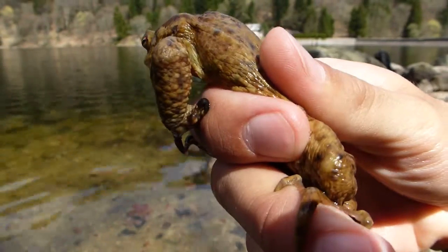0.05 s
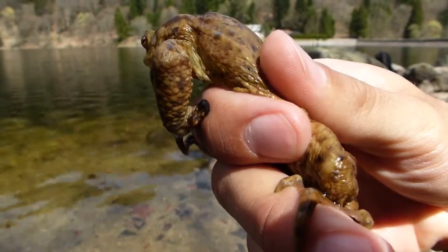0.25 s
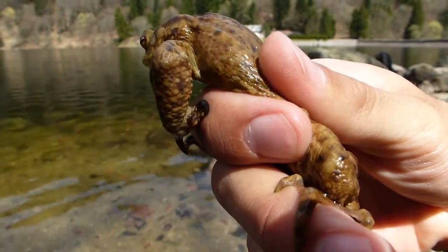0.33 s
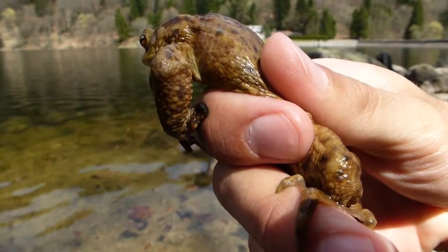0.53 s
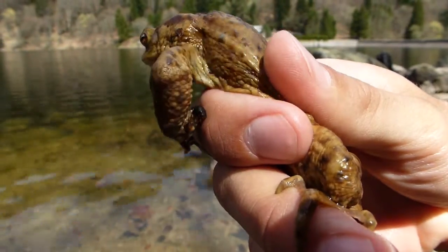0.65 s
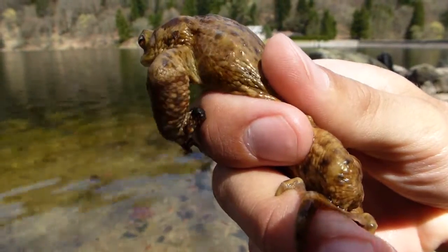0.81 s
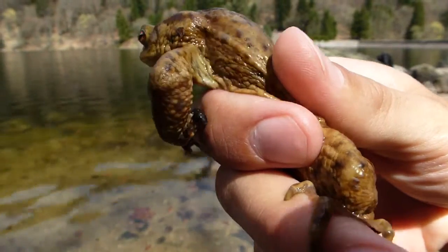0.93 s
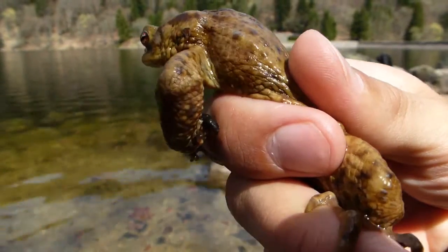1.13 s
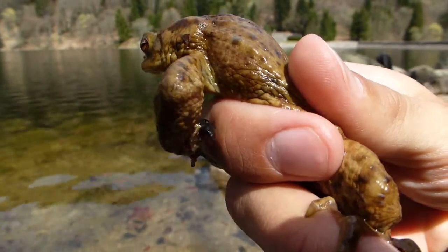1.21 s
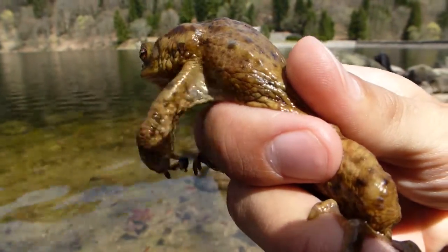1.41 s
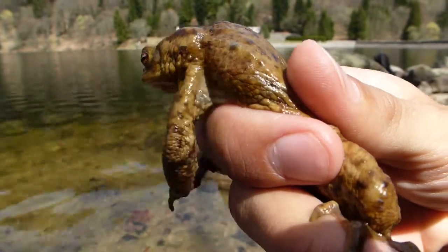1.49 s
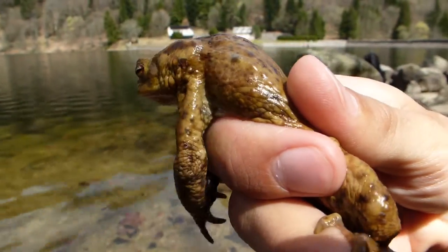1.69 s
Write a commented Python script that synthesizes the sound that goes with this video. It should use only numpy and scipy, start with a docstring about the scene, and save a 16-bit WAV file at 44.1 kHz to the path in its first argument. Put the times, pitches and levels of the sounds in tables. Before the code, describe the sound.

A toad gives four short, high, buzzy croaks close to the microphone, at about 0.2, 0.4, 0.7 and 1.0 seconds, each starting with a tiny raspy stutter. Soft wind and lake water wash underneath and carry on after the calls stop. A faint, distant trill wavers from around 0.5 to 1.5 seconds, and one thin, falling bird note sounds far off at 0.8 seconds.

```python
"""Beside a lake, a toad held in the hand gives four short release calls close to the microphone.
Its membranes catch in a few raspy stutters, then settle on a buzzy tone, coloured by the throat,
that mellows and sags as the air runs out. Behind it lies a soft wash of wind and water,
with a faint trill far off and one thin, falling bird note."""
import sys
import numpy as np
from scipy import signal
from scipy.fft import rfft, irfft
from scipy.io import wavfile
from scipy.ndimage import uniform_filter1d

SR = 44100
rng = np.random.default_rng(int(sys.argv[2]) if len(sys.argv) > 2 else 0)


def unload_wav(signal):
    """Save mono or channel-first audio to the path in sys.argv[1] as 16-bit WAV at rate SR, clipped to [-1, 1]."""
    wavfile.write(
        sys.argv[1],
        SR,
        np.round(np.clip(np.atleast_2d(signal).T, -1, 1) * 32767).astype(np.int16),
    )


N = 77175  # 1.75 s

# The held part of each call, right at the microphone. Each row: start and length in seconds, level in
# dB, pitch in Hz, rise in seconds, scoop and climb as shares of the pitch, fade, buzz and sizzle in dB,
# roughness from 0 to 1, the throat's peak in Hz, and the start of its treble roll-off in Hz.
CROAKS = [(0.2384, 0.04, -11.5, 942, 0.0063, 0.013, -.008, -9, -38, -29, 0.22, 3700, 13100),
          (.4380, 0.054, -10.5, 920.1, .024, 0.1727, 0.1, -4, -35, -33, 0.13, 2560, 10100),
          (0.6977, .0355, -8.5, 995.3, 0.0027, .02, -0.0069, -13, -41.5, -44, 0.24, 3350, 11900),
          (0.9703, 0.037, -11, 1006, 0.0041, 0.018, -0.01, -8.5, -35, -36, 0.2, 4380, 13000)]


def croak(start, length, db, hz, rise, scoop, climb, fade_db, buzz_db, sizzle_db, roughness):
    """Controls of a held tone: it scoops up to pitch, mellows, then sags as the air runs out."""
    t = np.clip(np.arange(N) / SR - start, 0, length)
    progress = t / length
    release = soft_step((length - t) / 0.013)
    gate = soft_step(t / rise) ** 1.51 * release
    bright_gate = soft_step(t / rise * 1.17) ** 3 * release ** 1.1
    onset_dip = scoop * np.exp(-(2.8 * t / rise) ** 2)
    sag = 0.14 * np.exp((t - length) / 0.0043)
    pitch = hz * (1 + climb * (progress - 0.5) - onset_dip - sag)
    tone = gate * amp(db + fade_db * progress ** 1.98)
    octave = gate * amp(-34 + 11 * progress ** 2)  # swells as the pressure falls
    buzz = bright_gate * amp(buzz_db - 11.5 * progress ** 2)
    sizzle = bright_gate * amp(sizzle_db - 23 * progress ** 1.42)
    return pitch, roughness, tone, octave, buzz, sizzle


def throat(hz, peak_db=4.5, width_hz=380, roll_off_db_per_hz=0.002):
    """Gain of the throat, which favours one overtone; peak and roll-off shift from call to call."""
    starts, *_, peaks, corners = np.transpose(CROAKS)
    peak_hz, corner_hz = (np.interp(np.arange(N) / SR, starts, column) for column in (peaks, corners))
    resonance_db = peak_db * np.exp(-((hz - peak_hz) / width_hz) ** 2)
    return amp(resonance_db - roll_off_db_per_hz * np.maximum(hz - corner_hz, 0))


# Catches of the voice just before each tone holds, equally close. Each row: start and length in
# seconds, level in dB, first pitch in Hz, rasp in dB.
CATCHES = [(0.2329, 0.00374, -15.5, 1018, -33.5), (.4300, 0.0038, -25, 859, -59),
           (0.4334, 0.0035, -20, 900, -47), (0.6722, 0.0022, -16.5, 1086, -34.5),
           (0.6796, 0.0026, -12.5, 1054, -34.5), (0.6874, 0.0025, -11.5, 1040, -38),
           (0.6929, 0.004, -16.5, 1022, -38), (0.946, 0.002705, -18.5, 1104, -29),
           (0.9533, 0.0032, -15, 1109, -30), (0.9611, 0.0039, -15.5, 1071, -32),
           (0.9666, 0.00444, -12.5, 1078, -33.5)]
THROAT_REST_HZ = 803.5


def catch(start, length, db, hz, rasp_db, roughness=0.86, ring_s=0.00173):
    """Controls of a catch: the membranes rattle for a few cycles, then the throat rings down."""
    t = np.maximum(np.arange(N) / SR - start, 0)
    after = np.maximum(t - length, 0)
    ring_down = np.exp(-after / ring_s)
    drooping_hz = hz * (1 - 0.093 * np.minimum(t / length, 1))
    pitch = THROAT_REST_HZ + (drooping_hz - THROAT_REST_HZ) * ring_down
    pitch *= 1 + 0.018 * drift(rate_hz=116)
    tone = soft_step(t / length) ** 1.713 * ring_down * amp(db)
    rattle = soft_step(t / 0.0015) ** 2 * np.exp(-after / 0.002)
    octave, buzz, sizzle = rattle * amp(db - 16.5), rattle * amp(rasp_db), rattle * amp(rasp_db - 1)
    return pitch, roughness, tone, octave, buzz, sizzle


def slap_harmonic(k, pitch, phase, roughness, smear_hz=5500, wander_db=3):
    """One harmonic of the membranes' slap: the higher it lies, the more roughness smears it."""
    smear = np.clip(roughness * k * pitch / smear_hz, 0, 1)
    flutter = (drift(rate_hz=25 * k) + 1j * drift(rate_hz=25 * k)) / np.sqrt(2)
    envelope = (np.sqrt(1 - smear ** 2) + smear * flutter) * amp(wander_db * drift(rate_hz=19))
    return (envelope * np.exp(1j * (k * phase + 0.9 * rng.standard_normal()))).real


# The membranes' colour from close up: buzz in the middle harmonics, sizzle at the top.
# Each row: frequency in Hz, relative level in dB.
BUZZ_SPECTRUM = [(1700, -10), (2450, -6.5), (3000, 4.5), (3500, -2.5), (3950, -5.5), (4400, -6),
                 (5000, -3.5), (5600, -9.5), (6300, -6), (7200, -19.5), (8500, -19), (12000, -40)]
SIZZLE_SPECTRUM = [(1500, -37), (6500, -17), (8200, -14), (9200, -3), (10200, -0.5), (11300, -3.5),
                   (13000, -4.5), (14200, -17), (15000, -10), (15500, -38)]


def toad(air=0.5, jitter=0.00403):
    """One pair of membranes: a strong fundamental, its octave, and a slap and puff of air each cycle."""
    parts = [croak(*row[:-2]) for row in CROAKS] + [catch(*row) for row in CATCHES]
    pitches, roughnesses, tones, *upper_gains = zip(*parts)
    tone, octave, buzz, sizzle = map(sum, (tones, *upper_gains))
    # the loudest part leads the pitch and the roughness
    weight = tone + 1e-9
    pitch = (sum(hz * gain for hz, gain in zip(pitches, tones)) + 1e-9 * THROAT_REST_HZ) / weight
    roughness = np.clip(sum(rough * gain for rough, gain in zip(roughnesses, tones)) / weight, 0, 1)
    phase = 2 * np.pi * np.cumsum(pitch * (1 + jitter * drift(rate_hz=185))) / SR
    slaps = sum(slap_harmonic(k, pitch, phase, roughness) * throat(k * pitch) for k in range(3, 19))
    puffs = air * roughness * (1 + 2 * (0.5 + 0.5 * np.cos(phase)) ** 3)
    voice = tone * np.cos(phase) + octave * np.sin(2 * phase)
    for gain, spectrum in [(buzz, BUZZ_SPECTRUM), (sizzle, SIZZLE_SPECTRUM)]:
        breath = puffs * radiated(rng.standard_normal(N), spectrum)
        voice += gain * (radiated(slaps, spectrum) + breath) / np.sqrt(2)
    return voice


def radiated(x, spectrum, thin_hz=350):
    """Colours a sound by a spectrum, at rms 1; the small body radiates little bass."""
    hz = np.fft.rfftfreq(N, 1 / SR)
    bass_loss = np.minimum(hz / thin_hz, 1) ** 2
    return unit_rms(irfft(rfft(x) * amp(spectrum_db(spectrum, hz)) * bass_loss, N))


# Wind and water on the lake behind the toad. Each row: frequency in Hz, relative noise density in dB.
WASH_SPECTRUM = [(15, -60), (25, -37), (70, -21.5), (170, -16.5), (284, -1), (414, -6), (500, -1.5),
                 (587, -5.5), (881, -3.5), (1390, -8.5), (1510, -7.5), (1730, -10), (3780, -20.5),
                 (4210, -21.5), (4950, -23.5), (11100, -30), (15800, -38)]
# The swell of that wash below 1800 Hz. Each row: time in seconds, gain in dB.
WASH_SWELL = [(0, -1), (.45, 0.8), (.7, -0.7), (.9, 0.9), (1.25, 0), (1.5, -1.4), (1.75, 0.3)]


def lake_wash(patchy_db=1.5):
    """Wind and small waves: soft noise with drifting patches and a slow swell."""
    frames, hz = N // 256 + 5, np.fft.rfftfreq(1024, 1 / SR)
    real, imag, patches = rng.standard_normal((3, frames, len(hz)))
    patches = unit_rms(uniform_filter1d(uniform_filter1d(patches, size=10, axis=0), size=10, axis=1))
    spectra = (real + 1j * imag) * amp(spectrum_db(WASH_SPECTRUM, hz) + patchy_db * patches)
    noise = amp(-47.5) * unit_rms(signal.istft(spectra.T, nperseg=1024, noverlap=768)[1][:N])
    body = signal.sosfiltfilt(signal.butter(2, 1800, fs=SR, output="sos"), noise)
    return noise - body + body * gain_curve(WASH_SWELL)


# The far trill as it reaches the microphone. Each row: time in seconds, level in dB.
TRILL_LEVEL = [(0, -69), (.4, -67), (.58, -53), (.72, -54), (.84, -56), (.95, -59), (1.13, -55), (1.3, -61),
               (1.52, -57), (1.75, -69)]


def far_trill(hz=1525, width_hz=43.7):
    """A faint wavering tone, likely other toads trilling across the water."""
    phase = 2 * np.pi * np.cumsum(hz + width_hz / 2 * drift(rate_hz=23.73)) / SR
    flutter = 1 + 0.6 * drift(rate_hz=34)
    return gain_curve(TRILL_LEVEL) * unit_rms(flutter * np.cos(phase))


def bird(start_s=0.8, length_s=0.059, hz=4340, fall=0.05, db=-51.5):
    """One distant falling whistle."""
    progress = np.clip((np.arange(N) / SR - start_s) / length_s, 0, 1)
    pitch = hz * (1 - fall * progress) * (1 + 0.004 * drift(rate_hz=150))
    return amp(db) * np.sin(np.pi * progress) * np.sin(2 * np.pi * np.cumsum(pitch) / SR)


def amp(db):
    """Decibels to gain."""
    return 10 ** (np.asarray(db) / 20)


def unit_rms(x):
    """Scales to rms 1."""
    return x / np.sqrt(np.mean(x ** 2) + 1e-20)


def spectrum_db(points, hz):
    """Reads a spectrum on a log-frequency axis."""
    point_hz, db = np.transpose(points)
    return np.interp(np.log(hz + 1), np.log(point_hz + 1), db)


def gain_curve(points):
    """Gain over time from a curve in dB."""
    return amp(np.interp(np.arange(N) / SR, *np.transpose(points)))


def soft_step(u):
    """A soft step from 0 to 1."""
    return np.sin(np.pi / 2 * np.clip(u, 0, 1))


def drift(rate_hz):
    """A smooth random wander of rms 1."""
    hz = np.fft.rfftfreq(N, 1 / SR)
    return unit_rms(irfft(rfft(rng.standard_normal(N)) * np.exp(-0.5 * (hz / rate_hz) ** 2), N))


def scene():
    """One microphone in open air: the toad in front, the lake behind."""
    return (toad() + lake_wash() + far_trill() + bird())[None]


def record(dry):
    """The recorder passes nothing much above 15.8 kHz."""
    low_pass = signal.firwin(511, 15800, window=("kaiser", 9), fs=SR)
    return signal.oaconvolve(dry, low_pass[None], "same")


dry = scene()
out = record(dry)
unload_wav(out)
```